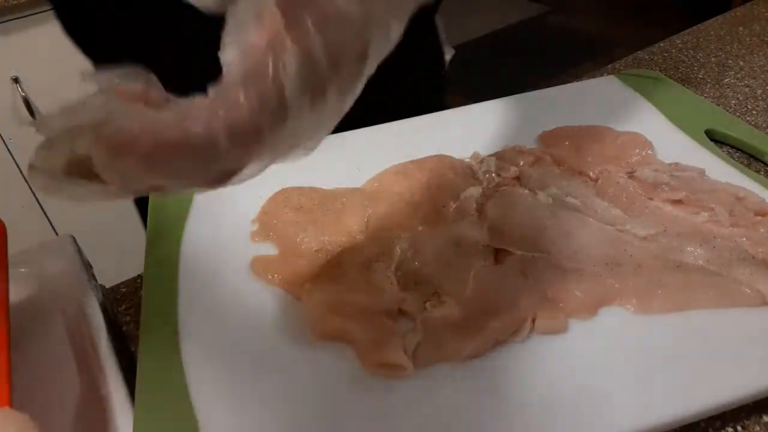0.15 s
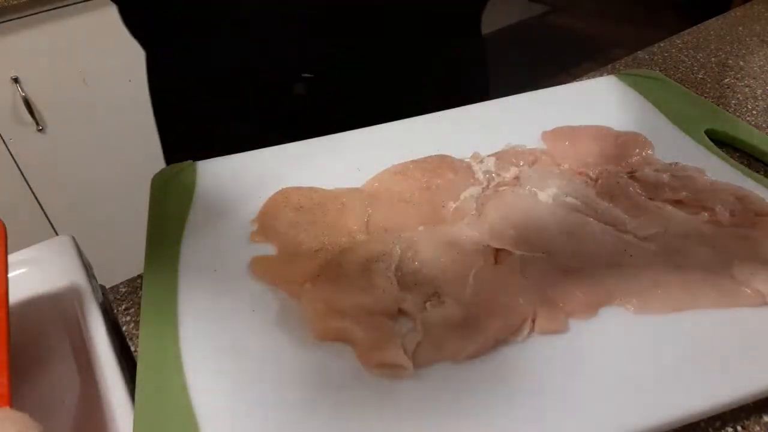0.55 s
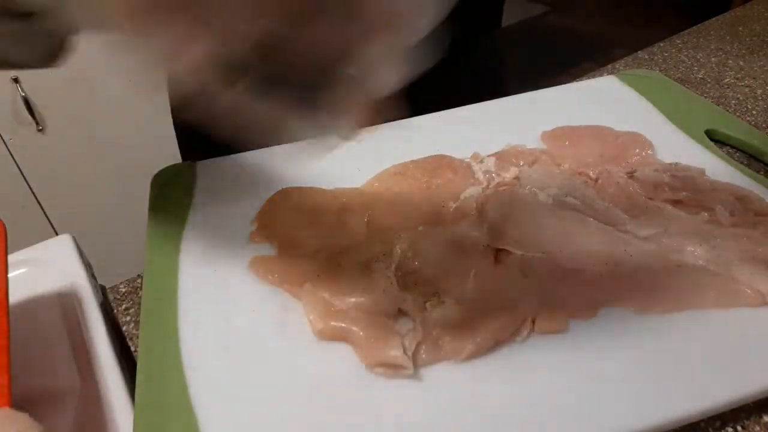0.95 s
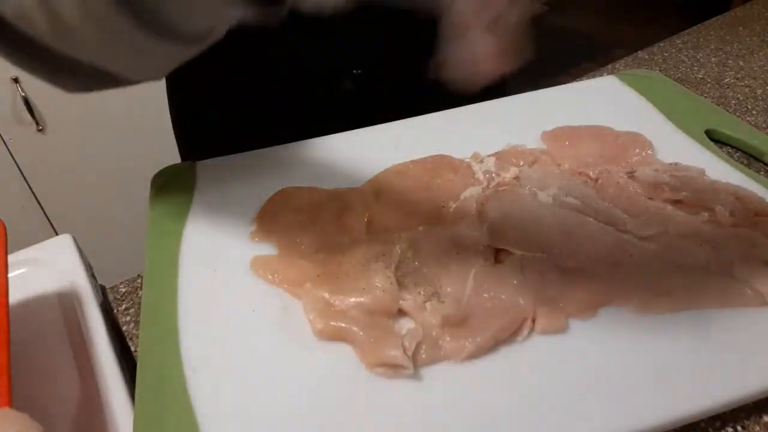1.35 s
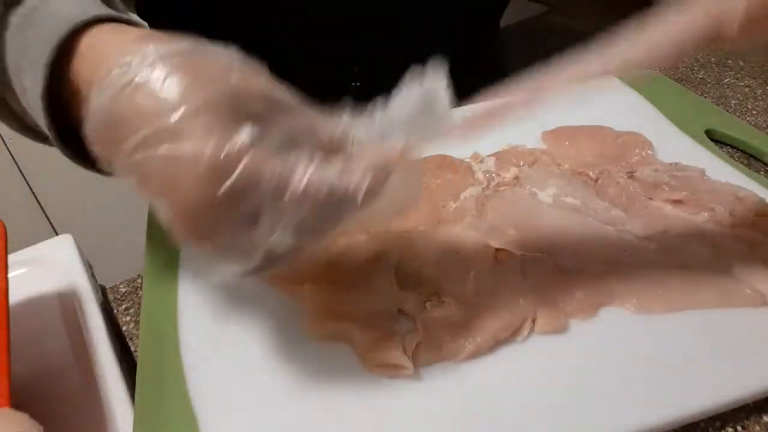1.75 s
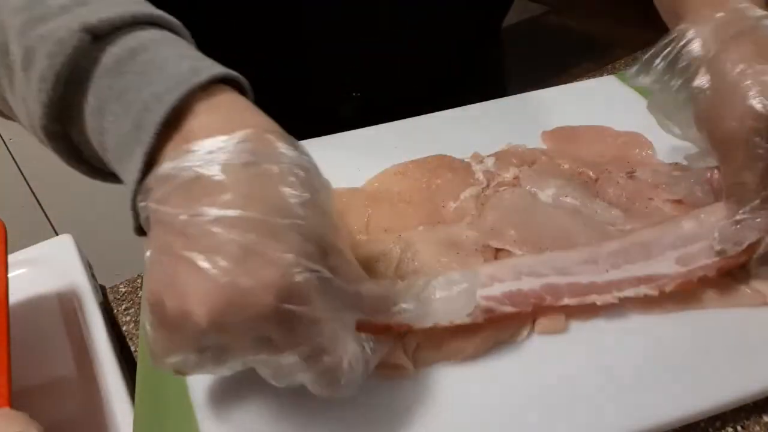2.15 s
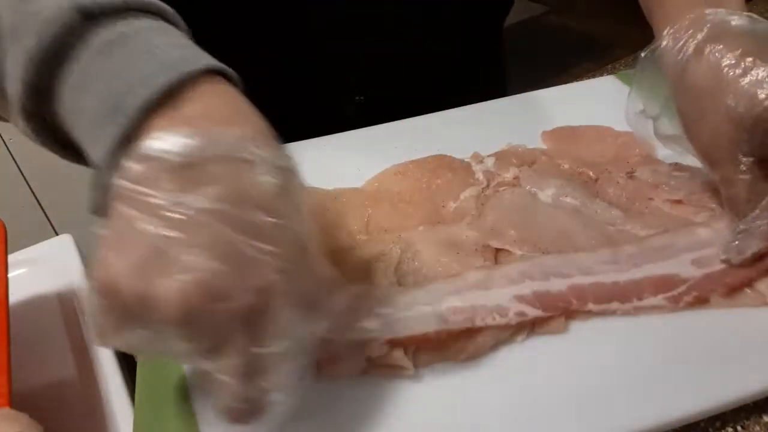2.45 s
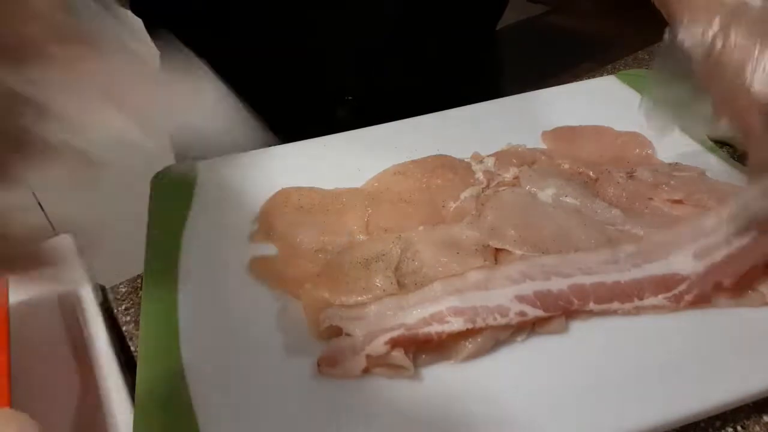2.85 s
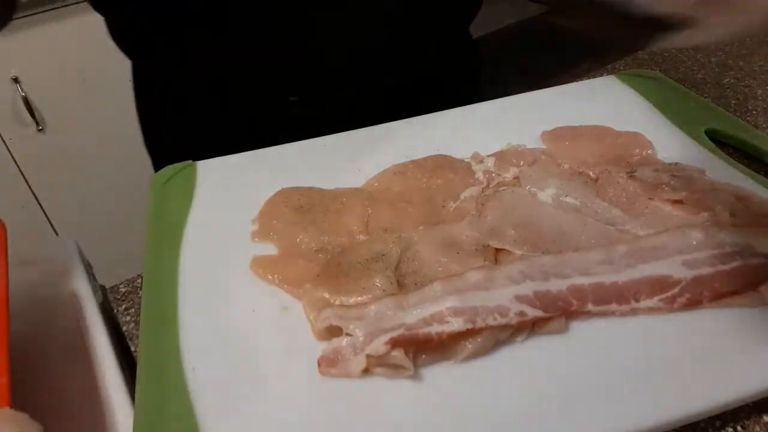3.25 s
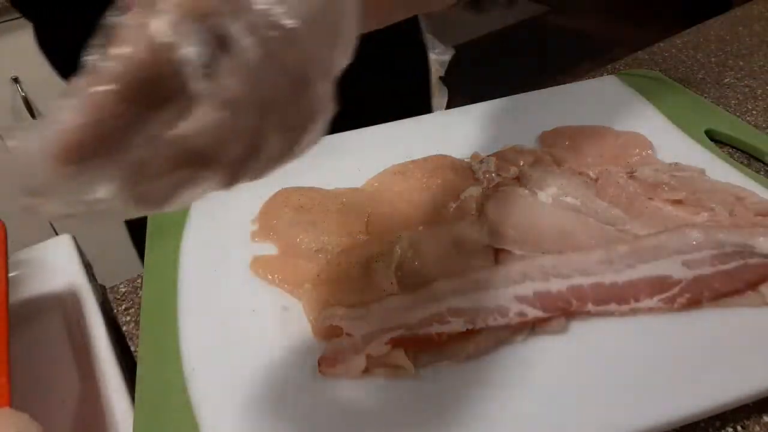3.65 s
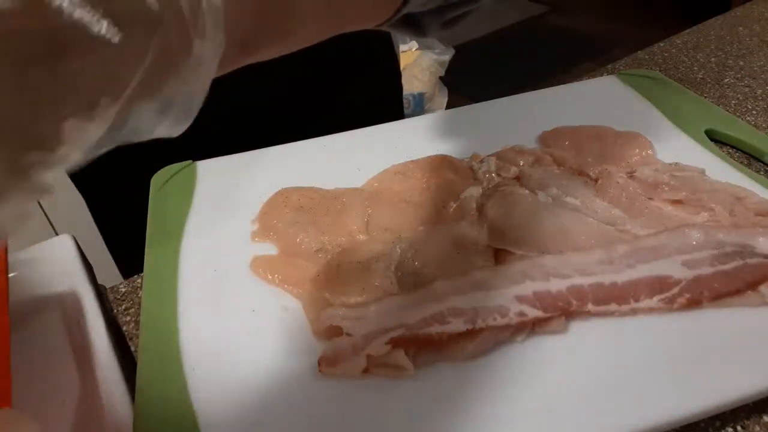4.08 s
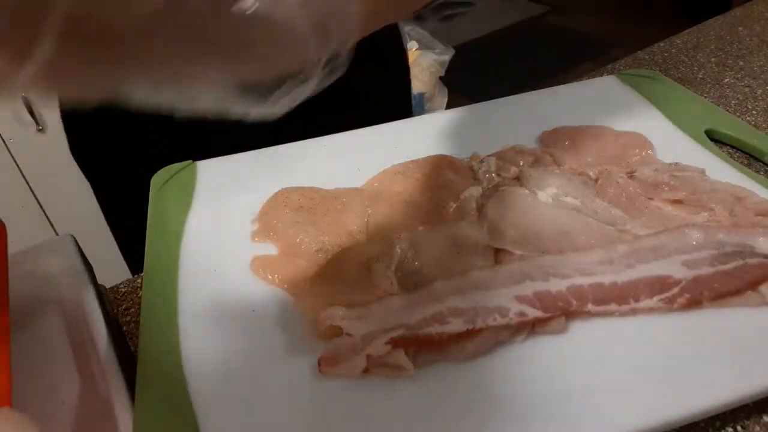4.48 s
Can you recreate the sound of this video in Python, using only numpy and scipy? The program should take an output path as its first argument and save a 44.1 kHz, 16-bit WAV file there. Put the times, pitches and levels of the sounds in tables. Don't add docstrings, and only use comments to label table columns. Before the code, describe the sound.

A close, two-channel camera pickup in a small, quiet kitchen. From 0 to 0.35 s there is only faint film rustle with tiny ticks, mostly left, over a weak, wavering low appliance rumble. At about 0.4 s a soft low bump comes as the gloved hands begin to move, and bright, hissy crinkling swells near 0.65, 0.9 and 1.3 s, with a sharp crack at 1.4 s. The rustle thins around 1.6-1.8 s, then grows fuller and lower, with slack folds, from 2.0 to 2.4 s as the strip is laid down. A snap marks 2.85 s. Around 3.1-3.3 s come the crispest cracks, a tight squeeze and two soft thuds, now clearly left. Another broad crinkle peaks near 3.8 s, eases around 4.1 s, then steady rustling with small snaps runs from 4.3 s to the end at about 4.6 s. Noise reduction leaves the texture slightly patchy.

```python
import sys
import numpy as np
from scipy import signal
from scipy.fft import rfft, irfft
from scipy.io import wavfile
from scipy.ndimage import uniform_filter1d

SR = 44100
rng = np.random.default_rng(int(sys.argv[2]) if len(sys.argv) > 2 else 0)


def log_audio(samples):
    frames = np.atleast_2d(samples).T
    limited = np.clip(frames, -1, 1)
    pcm = np.round(limited * 32767).astype(np.int16)
    wavfile.write(sys.argv[1], SR, pcm)


def undo_db(level):
    steps = np.asarray(level, float) / 20
    return 10 ** steps


N = 203742


def evened(x):
    return x / np.sqrt(np.mean(x ** 2) + 1e-20)


def read(points, hz):
    f, value = np.transpose(points)
    return np.interp(np.log(hz + 1), np.log(f + 1), value)


def drift(shape, *spans):
    x = rng.standard_normal(shape)
    for axis, span in enumerate(spans):
        for _ in range(2):
            x = uniform_filter1d(x, int(span), axis)
    return evened(x)


def scatter(x, t60):
    r = undo_db(-120 / (t60 * SR))
    energy = signal.lfilter([1 - r], [1, -r], x ** 2)
    return np.sqrt(energy) * rng.standard_normal((2, len(x)))


# (frequency [Hz], density [dB per Hz])
ROOM = [(15, -50), (30, -52), (60, -17), (105, -3), (135, -1), (180, -9), (240, -5.5), (310, -16.5),
        (500, -53), (1400, -22), (7000, -16.5), (16000, -51)]
# (frequency [Hz], left-right likeness [0-1])
ROOM_SAME = [(60, 0.87), (130, 0.69), (290, 0.63), (640, .1), (1500, .02)]
# (frequency [Hz], level [dB rms])
HUM = [(107.7, -70)]
# (time [s], level [dB])
RUMBLE = [
    (0.0, -58.5),
    (0.15, -66),
    (0.63, -62),
    (1.53, -62),
    (1.57, -68),
    (2.29, -58.5),
    (2.73, -64.5),
    (2.78, -61),
    (4.62, -60),
]


def kitchen(level_db=-60, swell_db=2.5):
    frames, hz = N // 512 + 5, np.fft.rfftfreq(2048, 1 / SR)
    a, b, c, d = rng.standard_normal((frames, len(hz), 4)).T
    same = np.clip(read(ROOM_SAME, hz), -1, 1)[:, None]
    left = a + 1j * b
    z = np.array([left, same * left + np.sqrt(1 - same ** 2) * (c + 1j * d)])
    bass_db = np.interp(np.arange(frames) * 512 / SR, *np.transpose(RUMBLE))
    z *= undo_db((hz < 300)[:, None] * (bass_db - bass_db.mean()))
    z *= undo_db(read(ROOM, hz)[:, None] + swell_db * drift(a.shape, 5.2, 3.5))
    air = undo_db(level_db) * evened(signal.istft(z, nperseg=2048, noverlap=1536)[1][:, :N])
    for f, db in HUM:
        turns = np.cumsum(f * (1 + 0.0367 * drift(N, 4650))) / SR
        air = air + undo_db(db + 2.4 * drift(N, 4900)) * np.sin(2 * np.pi * turns)
    return air


def hump(t, peak, rise, fall, bend):
    return -10 * np.where(t < peak, (peak - t) / rise, (t - peak) / fall) ** bend


BEND, NEAR_DB = 1.72, -3
FUMBLE_DB = 0.55
REACH_S, IDLE_DB, BUSY_DB, REST_SLACK_DB = 0.336, -52.5, -45.5, -0.6
# (peak time [s], crackle level [dB], rise [s], fall [s], slackness [dB])
MOVES = [(0.001, -44, 0.01, 0.2, -0.8), (0.336, -46.5, 0.0074, 0.31, 0), (0.432, -39, 0.044, 0.019, 4),
         (0.465, -41.5, 0.011, 0.089, 1), (0.642, -34.5, 0.063, 0.12, 2.1), (0.843, -35, 0.11, 0.025, 3.5),
         (0.937, -36.5, 0.26, 0.044, 0.5), (1.06, -46, 0.02, 0.041, 1), (1.335, -34, 0.32, 0.03, 3.5),
         (1.421, -38, 0.12, 0.12, 3.5), (1.7, -43.5, 0.18, 0.022, 2), (1.814, -40, 0.13, 0.21, -0.5),
         (2.019, -35.5, 0.062, 0.11, 4.5), (2.222, -33.5, 0.18, 0.44, 2.5), (2.393, -40, 0.099, 0.048, 12),
         (2.552, -40, 0.082, 0.012, 14.5), (2.844, -34.5, 0.1, 0.16, 3), (3.106, -39, 0.035, 0.11, -7),
         (3.284, -34.0, 0.097, 0.176, 1.6), (3.583, -37, 0.19, 0.037, 0.5), (3.817, -33, 0.078, 0.26, -0.5),
         (4.222, -39, 0.071, 0.05, 5), (4.397, -41.0, 0.63, 0.22, -1.1), (4.574, -39.5, 0.038, 0.067, 1)]


def hands(t):
    s, db, rise, fall, slack_db = np.transpose(MOVES)[:, :, None]
    power = undo_db(2 * (db + hump(t, s, rise, fall, BEND)))
    rest = undo_db(2 * np.where(t < REACH_S, IDLE_DB, BUSY_DB))
    total = power.sum(0) + rest
    film_db = 10 * np.log10(total) + NEAR_DB + FUMBLE_DB * drift(len(t), 24)
    return film_db, ((power * slack_db).sum(0) + rest * REST_SLACK_DB) / total


def creases(per_s=7000, spread_db=3.0, clump_db=0.3, direct_db=-7, shared=0.67):
    struck = rng.random((2, N)) < per_s / SR
    size = np.minimum(rng.exponential(1, (2, N)), 4)
    clumps_db = clump_db * (drift(N, 40) + 0.25 * drift(N, 440))
    polarity = rng.choice([-1., 1.], (2, N))
    snaps = evened(struck * polarity * undo_db(spread_db * size + clumps_db))
    lead = np.interp(np.arange(N) / SR, [.5, 2.2, 2.9], [3, 8, 19]).astype(int)
    later = snaps[0][np.maximum(np.arange(N) - lead, 0)]
    direct = np.array([snaps[0], shared * later + 0.13 * snaps[1]])
    return evened(undo_db(direct_db) * direct + scatter(snaps[0], t60=0.03))


PALM_DB, PALM_PER_SLACK, CUFF_DB, CUFF_PER_SLACK = -2.2, 0.26, -3.5, 0.98
SHADE_HZ, SHADE_PER_DB = (5330, 8040), 0.16
# (frequency [Hz], level [dB])
FILM = [(60, -42), (250, -11.5), (500, -6.5), (1000, -4), (1600, -2.5), (2500, -1.5), (4000, -0.5),
        (6000, 1.5), (9000, 2.5), (12000, 3), (15500, -0.5)]
# (time [s], left-right level [dB])
PLACE = [
    (0.0, 3.0),
    (0.5, 1.0),
    (2.6, 1),
    (3.27, 6.5),
    (3.33, 4.5),
    (4.26, 5.0),
    (4.62, 4),
]
# (time [s], length [s], centre [Hz], width [octaves], level [dB])
SQUEEZES = [
    (3.32, 0.087, 3230, 1.04, 3.5),
    (3.26, 0.098, 2240, 0.19, 3.5),
    (3.91, 0.051, 2220, 0.1, 10),
    (2.33, 0.16, 1520, 0.16, 5),
    (3.2, 0.03, 2070, .15, 4),
    (2.06, 0.075, 2700, 0.68, 3),
    (3.92, .03, 10500, 1.3, 3),
]


def gloves(patchy_db=0.27, pan_low=0.81):
    hz, t, z = signal.stft(creases(), SR, nperseg=256, noverlap=192)
    film_db, slack_db = hands(t)
    pan_db = np.interp(t, *np.transpose(PLACE))
    moved_db = pan_db - np.mean(pan_db)
    palm_db = PALM_DB + PALM_PER_SLACK * slack_db
    cuff_db = CUFF_DB + CUFF_PER_SLACK * slack_db
    high = np.clip(np.log2((hz + 1) / 5500) / 1.14, 0, 1)[:, None]
    low = np.clip(np.log2(2500 / (hz + 1)) / 0.54, 0, 1)[:, None]
    folds_db = (1 - low) * palm_db + low * cuff_db
    field_db = film_db + (1 - high) * folds_db + read(FILM, hz)[:, None]
    for s, length, f, octaves, db in SQUEEZES:
        away = np.log2((hz[:, None] + 1) / f) / octaves
        field_db = field_db + db * np.exp(-((t - s) / length) ** 4 - away ** 2)
    shaded = ((hz > SHADE_HZ[0]) * (hz < SHADE_HZ[1]))[:, None]
    shade_db = -SHADE_PER_DB * shaded * moved_db
    side_db = moved_db / 2 * (pan_low + (1 - pan_low) * high)
    patches = np.array([drift(field_db.shape, 4.5, 30) for _ in z]) * (1 - 1.7 * high)
    later = np.exp(-2j * np.pi * hz * 0.0002)[:, None]
    right = np.sqrt(1 - (.28 * low) ** 2) * z[1] + .28 * low * later * z[0]
    sides_db = np.array([side_db + shade_db, -side_db])
    z = np.array([z[0], right]) * undo_db(field_db + sides_db + patchy_db * patches + 4.5)
    return signal.istft(z, SR, nperseg=256, noverlap=192)[1][:, :N]


SNAP_HZ, SNAP_HZ_PER_DB = 9700, 178
# (time [s], peak level [dB], left-right level [dB], length [ms])
SNAPS = [(0.0283, -30, 16, .84), (0.0382, -34, 9, 1.3), (0.057, -36, -5, 1.9), (0.1213, -44, 7, 2.5),
         (0.1412, -36, 9, 1.1), (0.1463, -30.5, 10, 2.3), (0.186, -37.5, -5, 1.3), (0.1985, -37, 5, 1.1),
         (0.2093, -40, -7, 1.6), (3.4434, -36, 9, .8), (0.3398, -34, -1, 0.71), (0.4313, -27, -5, .82),
         (0.4669, -32.5, -4, 1.3), (0.9324, -31, 8, 1.7), (1.067, -27, .3, 2.3), (1.0956, -28.5, 4, 1.2),
         (1.406, -25, 1, 2), (1.6561, -33, 2, 1.9), (1.6868, -33, 6, 2.1), (2.539, -31, -6, 2.6),
         (2.8417, -22.5, 4, 3.1), (2.9615, -27.5, 9, 1.2), (3.109, -22, 14, .35), (3.1573, -32, 3, 1.3),
         (3.282, -19.5, 13, 0.81), (3.5, -33, 4, 1.4), (4.3074, -25, 15, .7), (4.42, -28, 6, 1.1),
         (4.532, -28.5, 7, 1.5), (4.5652, -26, 7, 1.1)]


def big_snaps(tail_db=-12, tail_t60=0.08):
    out, t = np.zeros((2, N + 800)), np.arange(-100, 500) / SR
    for s, db, pan_db, ms in SNAPS:
        hz = SNAP_HZ + SNAP_HZ_PER_DB * pan_db
        band = signal.butter(2, [0.7 * hz / SR * 2, min(1.4 * hz, 17000) / SR * 2], "bandpass")
        burst = signal.lfilter(*band, rng.standard_normal((2, len(t))))
        burst = burst * np.exp(-abs(t) / (ms * np.where(t < 0, .0004, .0009)))
        peak = np.sqrt(uniform_filter1d(2 * burst ** 2, 44).max(1))
        for port, (late, drop_db) in enumerate([(0, 0), (14, -pan_db)]):
            start = round(s * SR) - 100 + late
            out[port, start:start + len(t)] += undo_db(db + drop_db) * burst[port] / peak[port]
    return out[:, :N] + undo_db(tail_db) * scatter(out[0, :N], tail_t60)


BUMP_HZ, BUMP_LENGTH_S, BUMP_DB = 58, 0.012, -4.5
# (time [s], peak level [dB])
BUMPS = [(0.039, -72), (0.282, -65), (0.426, -51), (0.693, -60), (1.085, -80), (1.473, -58), (1.667, -68),
         (1.859, -60), (2.079, -74), (3.066, -54), (3.255, -53), (3.469, -68), (3.678, -65), (4.355, -79)]


def bumps():
    out, t = np.zeros(N + 8000), np.arange(8000) / SR
    swell = (t / BUMP_LENGTH_S) ** 2 * np.exp(2 - 2 * t / BUMP_LENGTH_S)
    for s, db in BUMPS:
        swing = np.sin(2 * np.pi * BUMP_HZ * rng.uniform(.8, 1.57) * t) * swell
        out[round(s * SR):][:len(t)] += undo_db(db + BUMP_DB) * swing
    return out[:N]


def scene():
    return kitchen() + gloves() + big_snaps() + bumps()


GAP_WIDTH = 0.16
# (time [s], centre [Hz], length [s], depth [dB])
GAPS = [(0.39, 870, .03, 26), (0.61, 857, 0.082, 43), (0.596, 488, 0.075, 12), (0.74, 507, 0.066, 7),
        (1.3, 310, 0.22, 9), (1.465, 837, 0.06, 40), (1.623, 860, 0.046, 28), (1.627, 378, .05, 16),
        (1.855, 520, 0.12, 15), (2, 388, .06, 20), (2.115, 317, 0.073, 24), (2.71, 330, 0.059, 18),
        (3.078, 706, 0.056, 12), (3.567, 364, .04, 4), (3.714, 460, 0.052, 16), (3.753, 940, 0.033, 18),
        (4.138, 574, 0.089, 15), (4.5, 580, 0.2, 8)]


def suppress(x, dropout_db=32, rarity=1.45, blotch_db=1.8):
    hz, t, z = signal.stft(x, SR, nperseg=2048, noverlap=1536)
    hz = hz[:, None]
    cut_db = 0
    for s, f, length, db in GAPS:
        cut_db = cut_db + db * np.exp(-((t - s) / length) ** 4 - ((hz / f - 1) / GAP_WIDTH) ** 4)
    chance = np.array([drift(cut_db.shape, 6, 4) + .9 * (hz < 1100) for _ in z])
    chance = .45 * chance + .9 * drift(cut_db.shape, 5, 3)
    chance_db = blotch_db * chance + dropout_db * np.clip(chance - rarity, 0, 1.2)
    cut_db = cut_db + chance_db * (hz > 250) * (hz < 8200)
    return signal.istft(z * undo_db(-cut_db), SR, nperseg=2048, noverlap=1536)[1][:, :N]


EDGE_HZ = 15980
# (frequency [Hz], level [dB])
LEFT_PORT = [(200, 1.9), (350, 1.5), (700, 1), (4500, 2), (7900, -3), (8300, 4), (8800, 2.5), (9600, 0.3),
             (12500, 1.5), (15000, 1.5)]
# (frequency [Hz], level [dB])
RIGHT_PORT = [(200, 4), (350, -7), (800, -2.9), (1500, 0.5), (4500, 1.5), (7800, 0), (8600, -2),
              (11700, -0.5), (13000, 0), (15000, -2.5)]


def microphone_ports(x):
    hz = np.fft.rfftfreq(N, 1 / SR)
    colour = undo_db([read(LEFT_PORT, hz), read(RIGHT_PORT, hz)]) * (hz < EDGE_HZ)
    return irfft(rfft(x) * colour, N)


def low_pass(x):
    return signal.sosfilt(signal.butter(12, 17000, fs=SR, output="sos"), x)


def record(dry):
    mix = microphone_ports(suppress(dry))
    return low_pass(mix)


dry = scene()
out = record(dry)
log_audio(out)
```